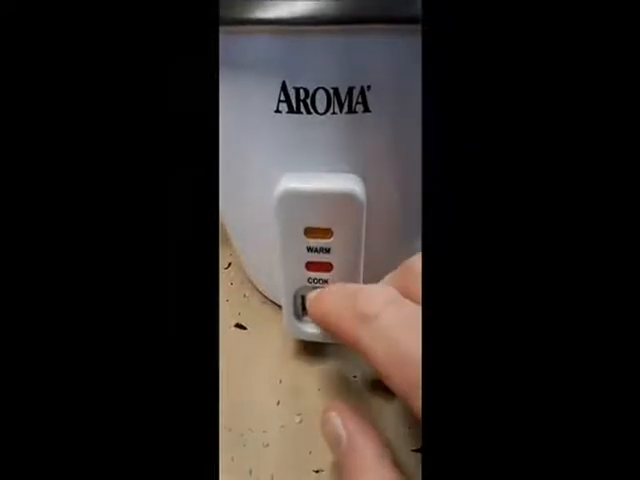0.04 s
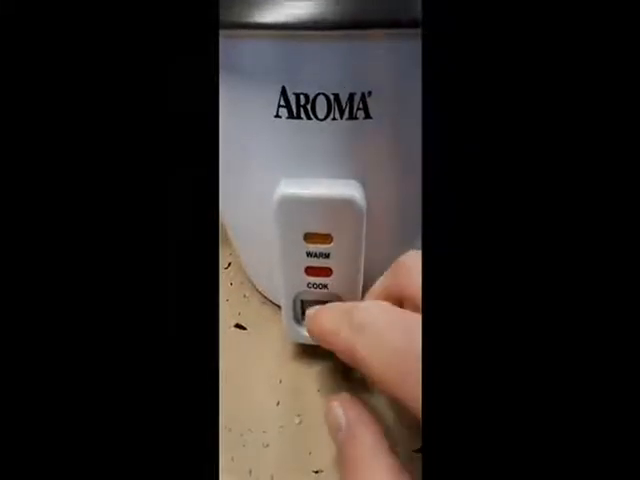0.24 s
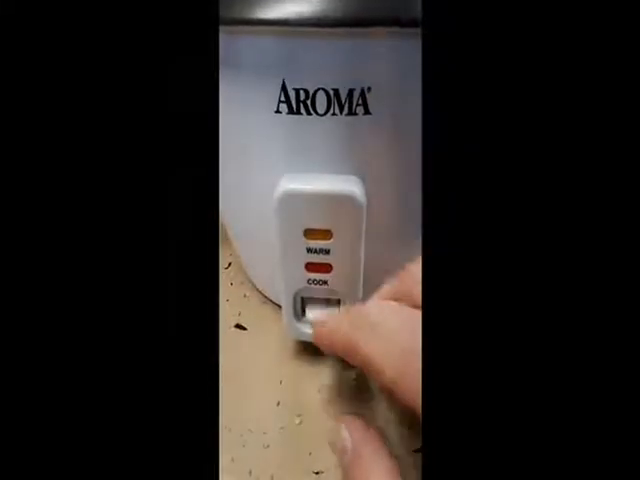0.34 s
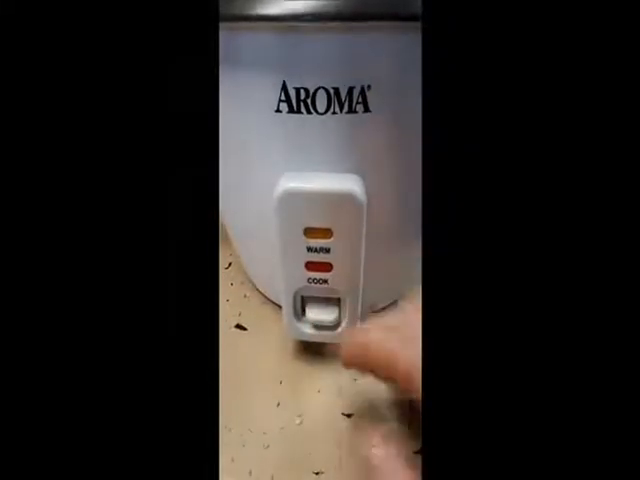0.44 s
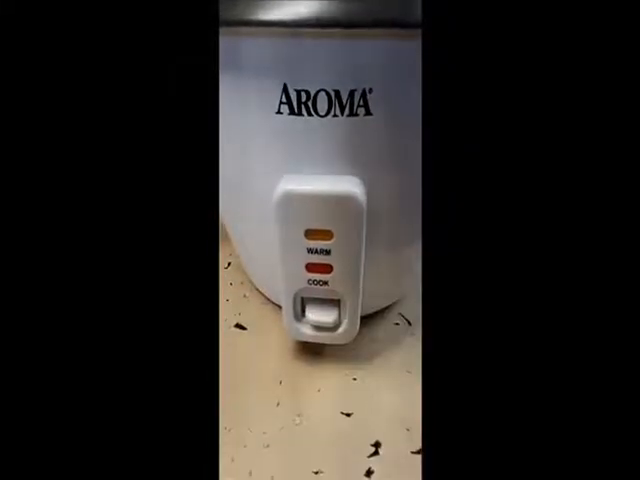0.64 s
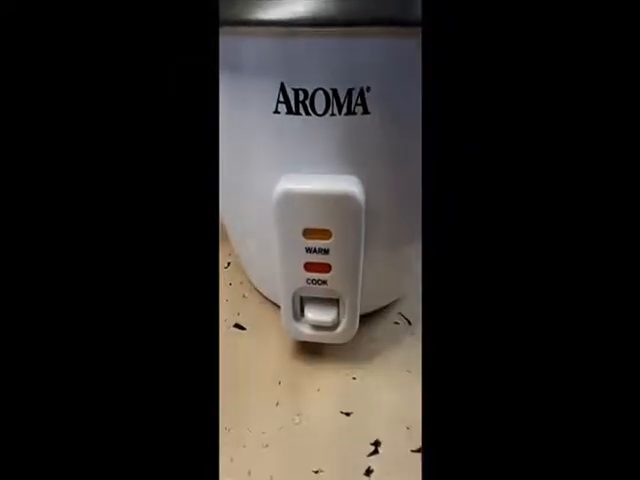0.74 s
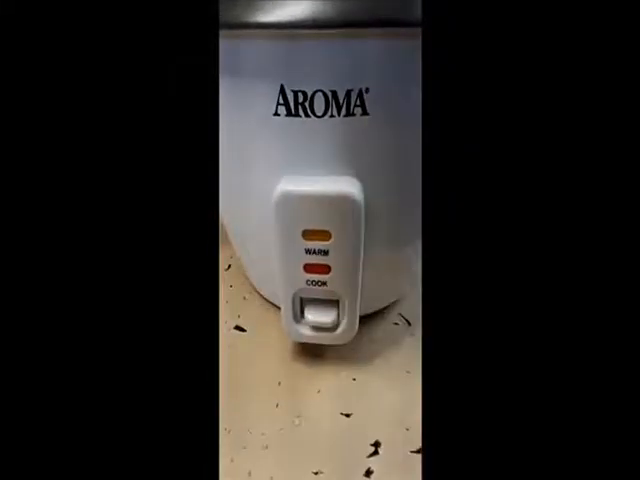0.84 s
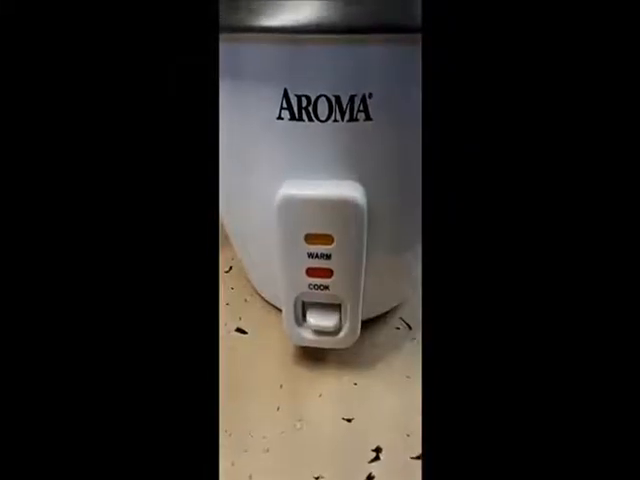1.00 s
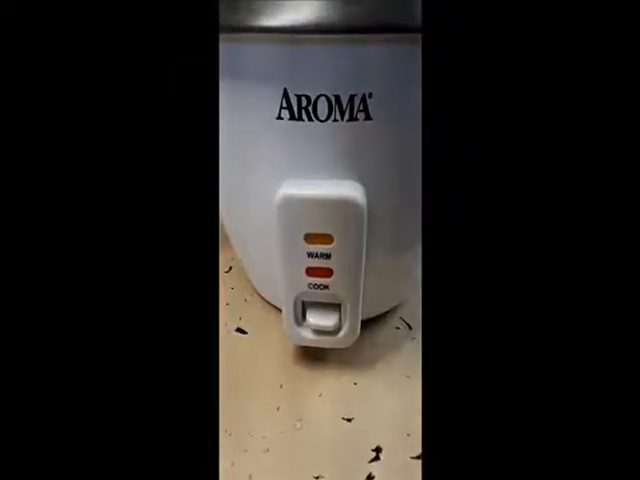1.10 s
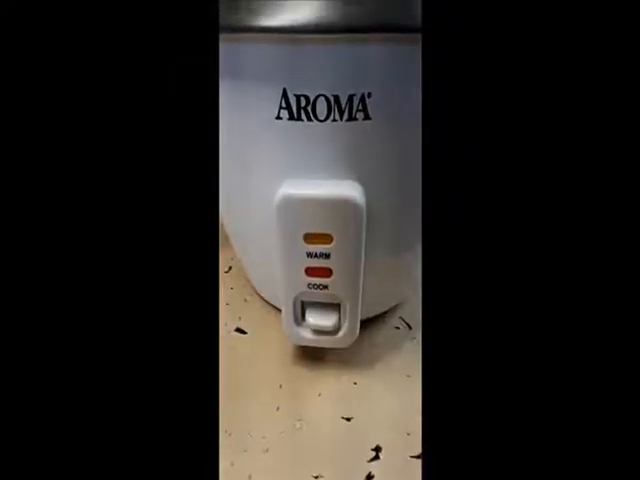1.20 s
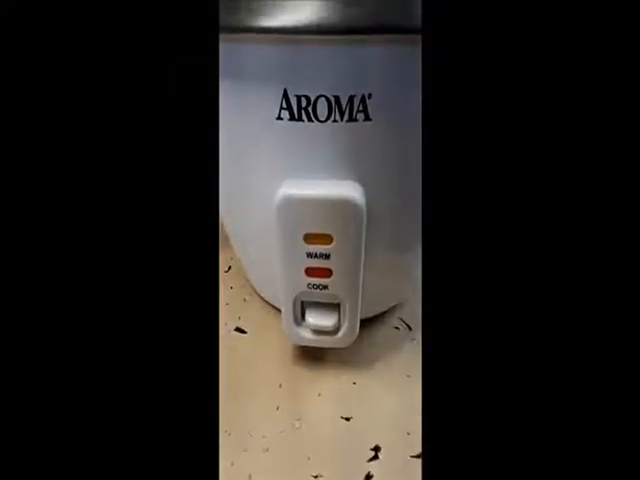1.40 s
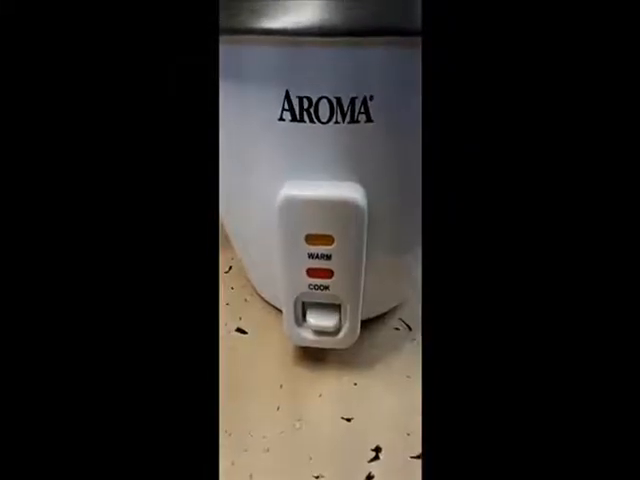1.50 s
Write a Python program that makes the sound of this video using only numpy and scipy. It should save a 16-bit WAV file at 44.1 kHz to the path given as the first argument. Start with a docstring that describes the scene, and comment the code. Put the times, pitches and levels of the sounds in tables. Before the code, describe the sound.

A rice cooker lever scrapes briefly under a finger and snaps over with one sharp, slightly ringing click. Light taps follow as the finger lets go. It is heard close up in a small kitchen with a low hum.

```python
"""A rice cooker lever snaps over under a finger, close by in a small kitchen.
It scrapes and pings under load, then hits its stop: a hard crack, ringing sheet metal, a low boom
of the pot and a short room tail. Light taps, faint scrapes and a dull thud follow as the finger
lets go, then soft swishes of the hand. Behind it, room noise and a low hum sink and rise again."""
import sys
import numpy as np
from scipy import signal
from scipy.fft import rfft, irfft
from scipy.io import wavfile
from scipy.ndimage import uniform_filter1d

SR = 44100
rng = np.random.default_rng(int(sys.argv[2]) if len(sys.argv) > 2 else 0)


def inscribe(sig):
    """Save sig as 16-bit PCM at rate SR to the path in sys.argv[1].

    A 1-D sig is mono; a 2-D sig holds one channel per row.
    Samples are clipped to [-1, 1] before scaling.
    """
    pcm = np.round(np.clip(np.atleast_2d(sig).T, -1, 1) * 32767)
    wavfile.write(sys.argv[1], SR, pcm.astype(np.int16))


N = 68355
TIME_S = np.arange(N) / SR
FREQ_HZ = np.maximum(np.arange(N // 2 + 1) * SR / N, 1)
LEFT_RIGHT = np.array([[1], [-1]])
SNAP_S = 0.2543


def gain(db):
    """Decibels to amplitude."""
    return 10 ** (np.asarray(db) / 20)


def curve_at(points, hz):
    """Interpolate on a log-frequency axis."""
    knots_hz, values = np.array(points, float).T
    return np.interp(np.log(hz), np.log(knots_hz), values)


def unit_rms(x):
    """Scale to rms 1."""
    return x / np.sqrt(np.mean(x ** 2))


def envelope(start_s, rise_s, t60_s, hold_s=0):
    """Linear attack; exponential decay from hold_s after the start."""
    age_s = TIME_S - start_s
    attack = np.clip(age_s / rise_s, 0, 1)
    return attack * np.exp(-np.log(1000) * np.maximum(age_s - hold_s, 0) / t60_s)


# Left-right likeness of noise (frequency [Hz], correlation [-1..1])
STEREO_CORRELATION = [(50, -0.24), (140, 0.22), (280, 0.4), (500, 0.78), (1100, 0.19), (2200, -0.11),
                      (5000, 0.3), (15000, 0.05)]
def noise(spectrum, pan_db=0):
    """Coloured, partly correlated stereo noise of rms 1; pan_db is left minus right."""
    mid, side = rfft(rng.standard_normal((2, N)))
    correlation = curve_at(STEREO_CORRELATION, FREQ_HZ)
    mid, side = mid * np.sqrt(1 + correlation), side * np.sqrt(1 - correlation)
    pair = (mid + LEFT_RIGHT * side) * gain(LEFT_RIGHT * pan_db / 2)
    return unit_rms(irfft(pair * gain(curve_at(spectrum, FREQ_HZ)), N))


def narrow_noise(hz, width_hz):
    """Two independent noises around one resonance; rms 1."""
    phasors = np.exp(2j * np.pi * rng.random((2, len(FREQ_HZ))))
    return unit_rms(irfft(phasors / (1 + ((FREQ_HZ - hz) / width_hz) ** 2), N))


def shell_ripple(x, spacing_hz=70, depth_db=3.2):
    """The shell's many small resonances as a random comb filter; rms 1."""
    knots_hz = np.arange(0, SR / 2, spacing_hz)
    heights = np.clip(rng.standard_normal(len(knots_hz)), -2, 2)
    ripple_db = depth_db * np.interp(FREQ_HZ, knots_hz, heights)
    return unit_rms(irfft(rfft(x) * gain(ripple_db), N))


# Stereo balance of the cooker (frequency [Hz], left minus right [dB])
COOKER_PAN = [(200, 3), (700, 9.5), (2400, -1), (5000, 0), (7300, 3), (9500, 6), (12500, 2.5), (16000, 0)]
def ring(modes, start_s, rise_s, ear_lag_s=0.00009):
    """Struck modes; the left-right phase gap grows with pitch, up to a quarter cycle."""
    out = np.zeros((2, N))
    for (hz, db, t60_s), (half_turns, skew) in zip(modes, rng.uniform(-1.04, 1, (len(modes), 2))):
        gap_rad = np.sign(skew) * min(2 * np.pi * hz * ear_lag_s, np.pi / 2)
        phase_rad = np.pi * half_turns + LEFT_RIGHT * gap_rad / 2
        tone = np.sin(2 * np.pi * hz * (TIME_S - start_s) + phase_rad)
        pan = gain(LEFT_RIGHT * curve_at(COOKER_PAN, hz) / 2)
        out += gain(db) * pan * tone * envelope(start_s, rise_s, t60_s)
    return out


# Room noise colour (frequency [Hz], relative density [dB])
ROOM_SPECTRUM = [(25, -32), (60, -15.5), (110, -10), (180, -22), (330, 0), (490, -0.5), (720, -6),
                 (1000, -3.5), (1450, -5.5), (1930, -1.5), (2400, -8.5), (3200, -10), (4500, -15.5),
                 (6900, -20.5), (8300, -29.5), (12000, -34), (15000, -37), (16000, -47.5)]
# Room noise contour (time [s], level [dB])
ROOM_LEVEL = [(0, -39), (.1, -39.5), (.24, -38.5), (.36, -41), (.48, -43.5), (.6, -45.5), (.76, -47.5),
              (1.0, -48), (1.25, -48), (1.38, -48), (1.47, -44), (1.55, -42)]
def room_noise():
    """Broad noise that sinks and rises again."""
    level_db = np.interp(TIME_S, *np.array(ROOM_LEVEL).T)
    return gain(level_db) * noise(ROOM_SPECTRUM, pan_db=-0.97)


# Steady hum tones (harmonic number, relative level [dB])
HUM_HARMONICS = [(2, -8), (3, 1), (4, -4)]
# Hum resonances (centre [Hz], width [Hz], relative level [dB])
HUM_BANDS = [(142.1, 9.8, -16.5), (218.2, 17.5, -11.5), (258, 41, -3.5), (287.5, 17, -7)]
# Hum contour (time [s], gain [dB])
HUM_GAIN = [(0, -42.5), (.15, -40), (.35, -41.5), (.55, -47.5), (.8, -51), (1.05, -52), (1.25, -48.5),
            (1.4, -47), (1.55, -42.5)]
def hum(fundamental_hz=71.4, tones_db=-5, side_db=-13.5):
    """Three steady harmonics among wavering resonances."""
    out = 0
    for harmonic, db in HUM_HARMONICS:
        cycles = harmonic * fundamental_hz * TIME_S + rng.random()
        out = out + gain(tones_db + db) * np.sqrt(2) * np.sin(2 * np.pi * cycles)
    for hz, width_hz, db in HUM_BANDS:
        mid, side = narrow_noise(hz, width_hz)
        out = out + gain(db) * (mid + gain(side_db) * side * LEFT_RIGHT)
    return out * gain(np.interp(TIME_S, *np.array(HUM_GAIN).T))


# Swells in the room noise (start [s], hold [s], centre [Hz], level [dB])
ROOM_SWELLS = [(0.033, .05, 1947, -42.5), (1.095, .015, 1810, -53)]
def room_swells():
    """Narrow bands of noise swell faintly, almost to a tone."""
    out = 0
    for start_s, hold_s, hz, db in ROOM_SWELLS:
        swell = envelope(start_s, rise_s=0.0069, t60_s=0.22, hold_s=hold_s)
        out += gain(db) * narrow_noise(hz, width_hz=100) * swell
    return out


# Swish colour (frequency [Hz], relative density [dB])
SWISH_SPECTRUM = [(1000, -8), (5000, 12), (9000, -2), (15000, -5.5)]
# Hand movements (start [s], hold [s], level [dB])
HAND_MOVES = [(0.607, 0.25, -63), (0.866, 0.032, -57)]
def hand_swishes():
    """Soft, bright brushes as the hand draws back."""
    return sum(gain(db) * noise(SWISH_SPECTRUM) * envelope(start_s, rise_s=0.03, t60_s=0.2, hold_s=hold_s)
               for start_s, hold_s, db in HAND_MOVES)


# Thud of the body (frequency [Hz], relative density [dB])
THUD_SPECTRUM = [(30, -20), (70, -7), (100, 10), (150, -11), (300, -28), (1000, -68)]
def body_thud(level_db=-53):
    """The cooker settles on the counter when the push ends."""
    settle = envelope(start_s=0.39, rise_s=0.023, t60_s=0.44, hold_s=0.059)
    return gain(level_db) * noise(THUD_SPECTRUM) * settle


# Taps of finger and loose lever
# (start [s], knock pitch [Hz], knock t60 [s], knock [dB], panel [dB], lever [dB], tick [dB])
RELEASE_TAPS = [(0.3735, 467, 0.018, -21, -48, -45.5, -47), (0.3968, 336, 0.042, -26, -48, -28.5, -38),
                (0.4476, 330, 0.12, -33.5, -32.5, -38, -37.5), (0.479, 409, 0.068, -29.5, -37.5, -42, -42),
                (.5235, 350, 0.029, -25.5, -46, -50, -58), (.529, 590, 0.018, -34, -39.5, -49, -50),
                (.5600, 470, 0.018, -27, -62.5, -66, -63), (.574, 308, 0.034, -36, -43, -54, -57)]
# Panel modes (frequency [Hz], relative peak [dB], t60 [s])
PANEL_MODES = [(1064, 0.5, 0.072), (1130, -28, 0.025)]
# Loose lever modes (frequency [Hz], relative peak [dB], t60 [s])
LEVER_MODES = [(1975, -5, 0.08), (3230, -5, 0.027), (3340, 0, 0.042), (3515, 2.5, 0.025), (5900, -9, 0.014),
               (7400, -25, .05)]
# Tick colour (frequency [Hz], relative density [dB])
TICK_SPECTRUM = [(500, 2), (3300, 8), (4400, 1), (6500, 3.5), (9000, -6), (15500, -12)]
def release_taps(knock_rise_s=0.002, tick_rise_s=0.0011, contact_db=5):
    """Each tap knocks the housing, rings panel and lever, and ticks, sharpest at first contact."""
    out = 0
    for start_s, knock_hz, knock_t60_s, knock_db, panel_db, lever_db, tick_db in RELEASE_TAPS:
        knock = ring([(knock_hz, knock_db, knock_t60_s)], start_s, knock_rise_s)
        panel = gain(panel_db) * ring(PANEL_MODES, start_s, knock_rise_s)
        lever = gain(lever_db) * ring(LEVER_MODES, start_s, tick_rise_s)
        contact = gain(contact_db) * envelope(start_s, tick_rise_s, t60_s=0.008)
        decay = envelope(start_s, tick_rise_s, t60_s=0.074)
        tick = gain(tick_db) * shell_ripple(noise(TICK_SPECTRUM, pan_db=6)) * (contact + decay)
        out += knock + panel + lever + tick
    return out


# Lever slips (start [s], hold [s], level [dB])
LEVER_SLIPS = [(0.2095, 0.017, -29), (0.462, 0.0079, -43), (0.523, 0.012, -44.5), (0.573, 0.0069, -47.5)]
# Friction colour (frequency [Hz], relative density [dB])
SCRAPE_SPECTRUM = [(300, -14.5), (880, -6), (1050, -3), (1300, -15.5), (2030, 0), (2500, -3), (3000, 4),
                   (3350, -4), (3720, 2.5), (4400, -16), (5800, -4), (6500, -6.5), (7450, -4.5),
                   (8400, -14), (15500, -22.5)]
def lever_scrapes(grain_share=0.35):
    """The lever slides in its slot in short gritty slips."""
    grains = uniform_filter1d(rng.exponential(size=N) ** 2, size=40) / 2  # mean 1
    grit = unit_rms(1 - grain_share + grain_share * grains)
    out = 0
    for start_s, hold_s, db in LEVER_SLIPS:
        friction = shell_ripple(noise(SCRAPE_SPECTRUM, pan_db=3.5))
        out += gain(db) * friction * envelope(start_s, rise_s=0.0071, t60_s=0.15, hold_s=hold_s)
    return grit * out


# Loaded lever modes (frequency [Hz], peak [dB], t60 [s])
CATCH_MODES = [(1040, -32, .1), (2030, -40, .12), (3741, -29, .065), (5798, -38, .055), (7461, -40, .12)]
def lever_catch():
    """The lever pings as it takes up the load."""
    return ring(CATCH_MODES, start_s=0.2135, rise_s=0.004)


# Room tail colour (frequency [Hz], relative density [dB])
TAIL_SPECTRUM = [(50, -21.5), (130, -12.5), (450, 2), (750, -6.5), (1350, -5.5), (2300, 2), (2900, -2),
                 (3400, -2), (3950, -11), (4700, -4.5), (5450, -2), (6500, -4), (7500, -0.5), (8300, -6.5),
                 (9400, -2), (12800, 0), (13700, -2), (16000, -8)]
# Room tail decay (frequency [Hz], t60 [s])
TAIL_DECAY = [(100, 0.24), (500, 0.112), (2000, 0.26), (5000, 0.29), (9000, 0.23), (15000, 0.2)]
def snap_tail(tail_db=-16.5, slap_db=-24, late_db=-51):
    """Shell and kitchen ring on: a dense tail, a slap off the nearest wall, a faint late wash."""
    pan_db = curve_at(COOKER_PAN, FREQ_HZ)
    spectrum = rfft(shell_ripple(noise(TAIL_SPECTRUM, pan_db)))
    tail = 0
    for band_hz, t60_s in TAIL_DECAY:
        crossfade = curve_at([(hz, hz == band_hz) for hz, _ in TAIL_DECAY], FREQ_HZ)
        band = irfft(spectrum * crossfade, N)
        tail += band * envelope(SNAP_S + 0.0038, rise_s=0.0046, t60_s=t60_s)
    bounce = envelope(SNAP_S + 0.014, rise_s=0.00088, t60_s=0.07, hold_s=0.0056)
    slap = noise(TAIL_SPECTRUM, pan_db) * bounce
    late = noise(TAIL_SPECTRUM, pan_db) * envelope(SNAP_S, rise_s=0.033, t60_s=0.75)
    return gain(tail_db) * tail + gain(slap_db) * slap + gain(late_db) * late


# Crack of the lever on its stop (frequency [Hz], relative density [dB])
CRACK_SPECTRUM = [(60, -17), (200, -5.5), (480, 3.5), (800, -25), (1400, -13.5), (2200, 2.5), (3300, -4),
                  (4050, -12.5), (4700, -11.5), (5500, 8), (6400, -3), (7500, -3), (8400, -6.5), (9400, -1),
                  (12500, -5.5), (15500, -5)]
# Switch and shell modes (frequency [Hz], peak [dB], t60 [s])
SHELL_MODES = [(1061, -23, .11), (1624, -27, .13), (1951, -30, .18), (2021, -29, .14), (2215, -32, .15),
               (2368, -28, .14), (3207, -32, .22), (3455, -31, .25), (4963, -30.5, .19), (5514, -32, .16),
               (5610, -31, .13), (6021, -33, .22), (6425, -31, .17), (6974, -33, .16), (7227, -27, .17),
               (7555, -27, .18), (8105, -33, .16), (9081, -29, .16), (11432, -28.5, .14), (12295, -27, .15),
               (13707, -34, .16)]
# Pot modes (frequency [Hz], peak [dB], t60 [s])
POT_MODES = [(60, -42, .12), (110, -37, .12), (213, -20, .21), (284, -33.5, .25), (450, -25, .05)]
def lever_snap(crack_db=-11, chatter_s=0.0045, pot_lag_s=0.007):
    """The lever cracks against its stop and rings the shell; the pot booms just after."""
    burst = envelope(SNAP_S, rise_s=0.00093, t60_s=0.013, hold_s=chatter_s)
    crack = gain(crack_db) * noise(CRACK_SPECTRUM, pan_db=5.5) * burst
    shell = ring(SHELL_MODES, SNAP_S, rise_s=0.0037)
    pot = ring(POT_MODES, SNAP_S + pot_lag_s, rise_s=0.022)
    return crack + shell + pot


def scene():
    """Lever and handling over the room."""
    return (lever_snap() + snap_tail() + lever_scrapes() + release_taps() + hand_swishes()
            + room_noise() + hum() + lever_catch() + body_thud() + room_swells())


def record(dry):
    """Steep low-pass on the top treble."""
    cutoff_hz = 15900
    return signal.sosfilt(signal.ellip(10, 0.2, 80, cutoff_hz, fs=SR, output="sos"), dry)


dry = scene()
out = record(dry)
inscribe(out)
```